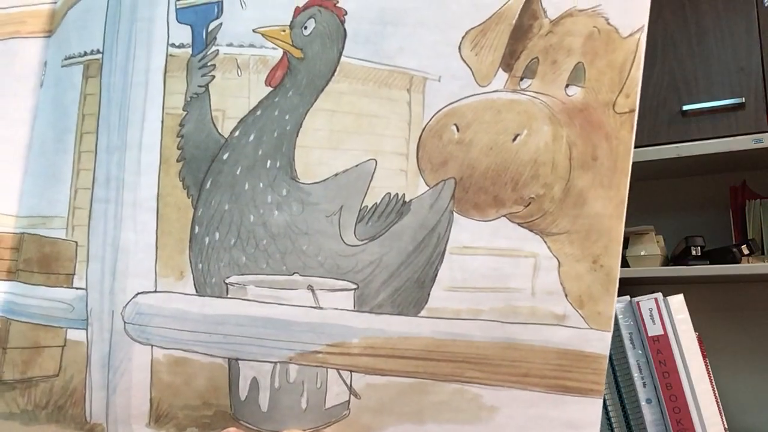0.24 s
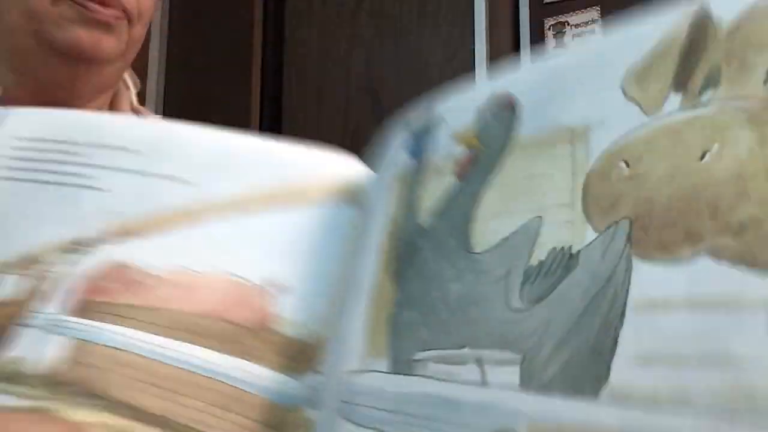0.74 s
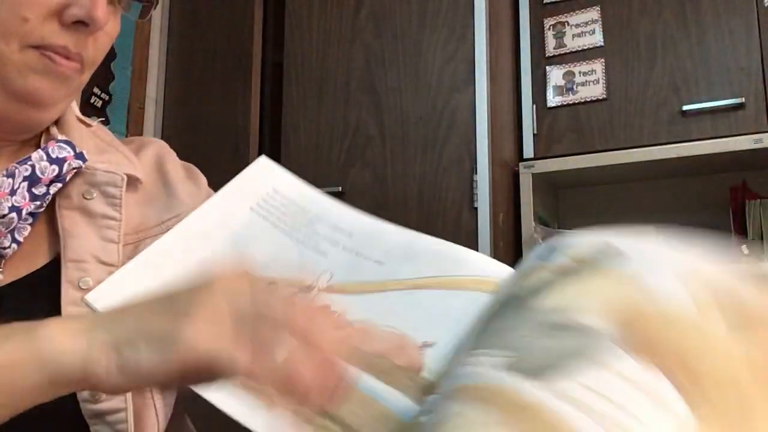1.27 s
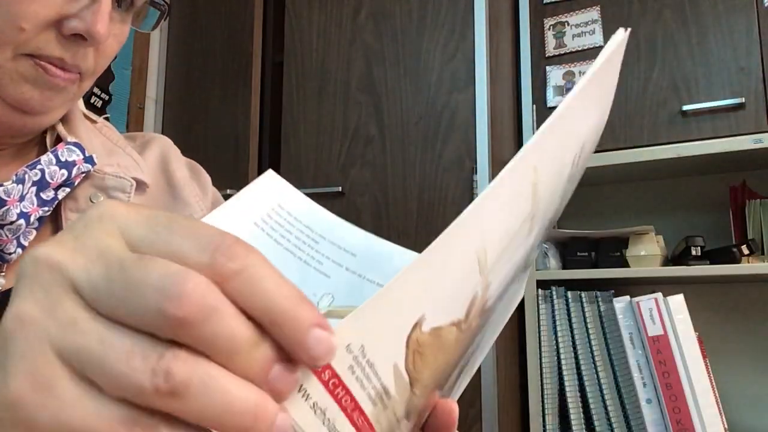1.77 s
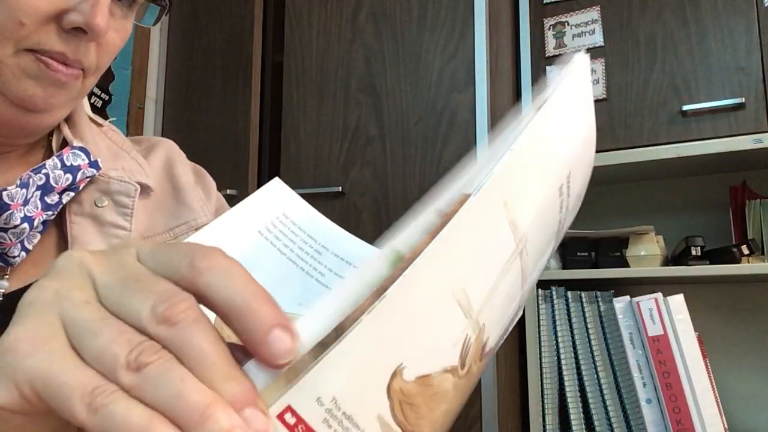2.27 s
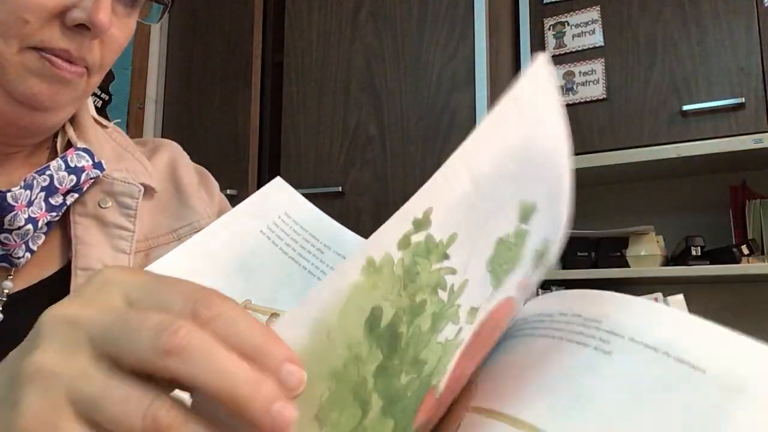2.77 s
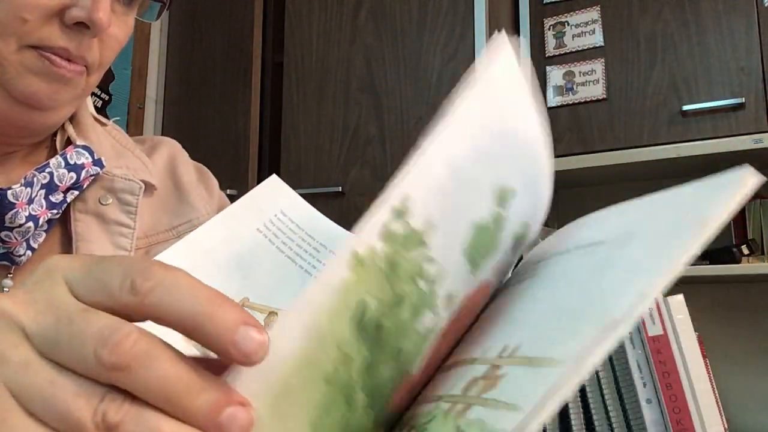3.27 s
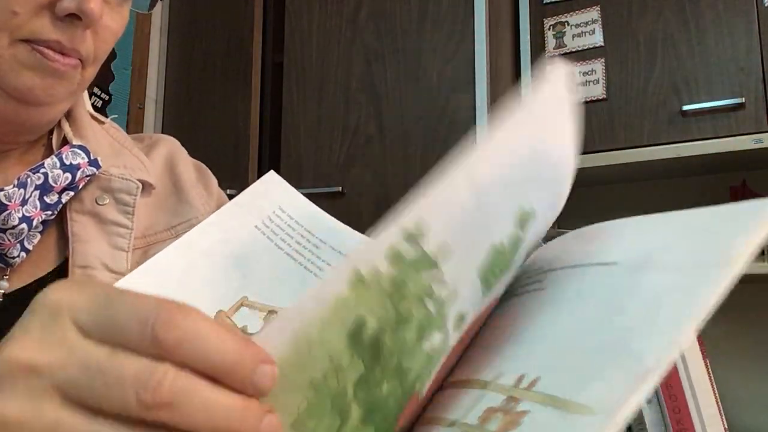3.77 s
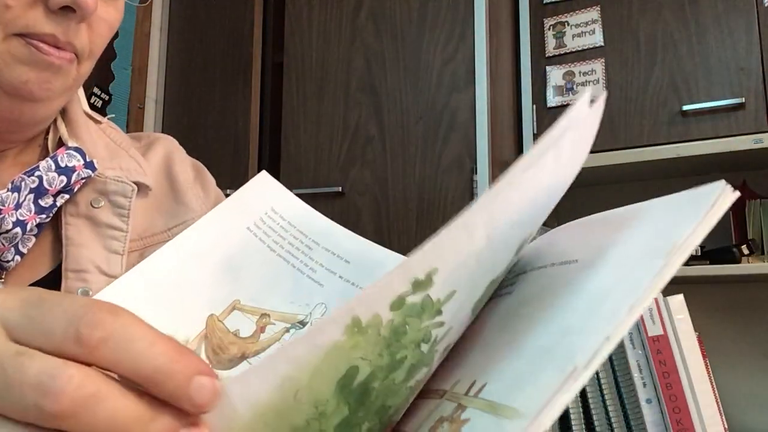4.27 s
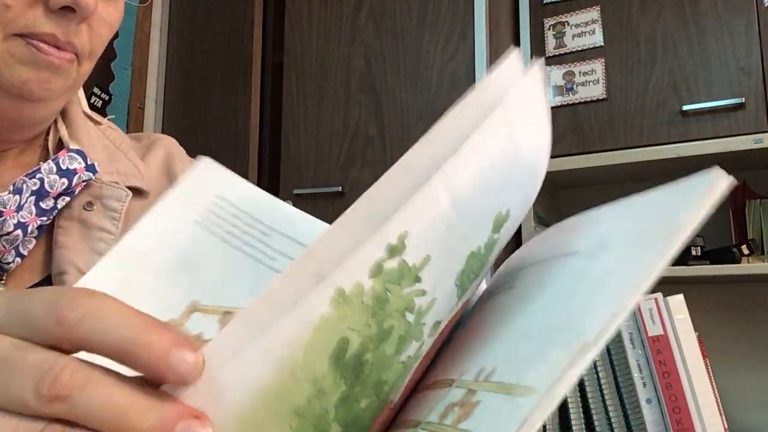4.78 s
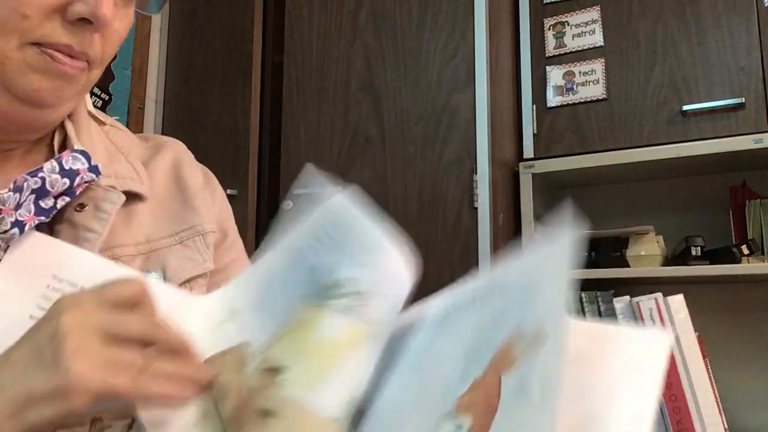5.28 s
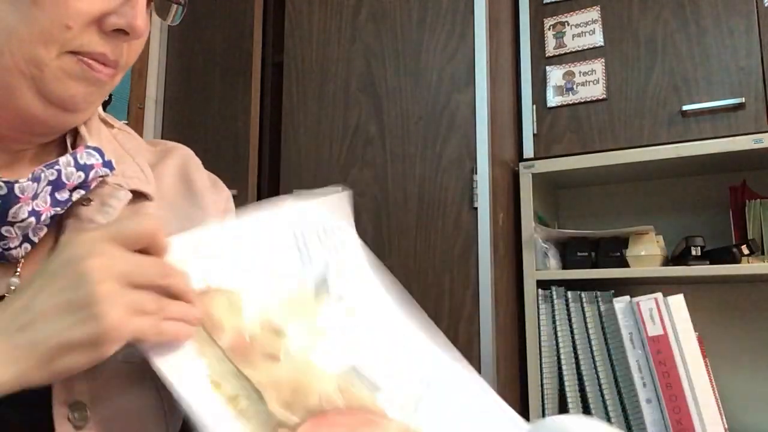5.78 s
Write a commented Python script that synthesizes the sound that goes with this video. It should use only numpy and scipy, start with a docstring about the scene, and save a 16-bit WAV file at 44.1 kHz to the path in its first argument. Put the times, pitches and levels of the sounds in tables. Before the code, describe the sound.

In a quiet room with a faint low rumble, paper rubs softly as a book is handled near the microphone. Page edges tick and flutter off a thumb in short runs, with a few dull bumps from the book. The rustling then gets busier and louder, with dry scrapes and crisp snaps of bending sheets, and ends with one crackling page turn and a brief slide.

```python
"""A picture book is leafed through close to the microphone in a quiet room.
First, sheets slide with a soft friction hiss and hands bump the book. From about 1 s a thumb sticks
and slips along the page edges, sending bending waves through the sheets, in runs after 2 s and 3 s.
From about 4.5 s the pages scrape past each other more often and buckle with louder snaps.
Near 5.8 s the last page sweeps over with a crackling flap."""
import sys
import numpy as np
from scipy import signal
from scipy.fft import rfft, irfft
from scipy.io import wavfile
from scipy.ndimage import uniform_filter1d

SR = 44100
rng = np.random.default_rng(int(sys.argv[2]) if len(sys.argv) > 2 else 0)


def to_wav(sig):
    """Store sig (one row per channel, or 1-D mono) as 16-bit WAV at the path in sys.argv[1].

    Samples outside -1..1 are clipped; the rate is SR.
    """
    pcm = np.clip(np.atleast_2d(sig), -1, 1) * 32767
    pcm = np.round(pcm).astype(np.int16)
    wavfile.write(sys.argv[1], SR, pcm.T)  # frames by channels


N = 265923

# Page edges escaping the thumb: time_s, sheet_level_db, edge_level_db
THUMB_SLIPS = [(0.9667, -50, -68), (1.4523, -50, -49), (2.008, -57.5, -49), (2.052, -55, -46.5),
               (2.0994, -48, -45.5), (2.16, -46.5, -45), (2.199, -48.5, -47), (2.2446, -49.5, -45.5),
               (2.2902, -55, -48.5), (2.3218, -63, -47.5), (2.3501, -57.5, -49), (2.3719, -64, -52),
               (2.4013, -62, -52.5), (2.492, -45.5, -46.5), (3.1913, -49.5, -55), (3.2727, -41, -42),
               (3.3369, -43, -45), (3.407, -42, -45), (3.515, -39, -46.5), (3.5621, -35.5, -43.5),
               (3.6108, -36, -44.5), (3.6382, -36.5, -50), (3.658, -44, -46), (3.68, -49, -61),
               (3.699, -44, -59), (3.7977, -42, -60)]
# The book's thump relative to the sheet, strongest while it is tipped open: time_s, level_db
BOOK_ROCKING = [(3.27, -16.5), (3.34, -1.5), (3.54, -5), (3.8, -23)]
# Spectrum of a flexed sheet: frequency_hz, level_db
RATTLE_SPECTRUM = [(80, -6), (170, 5), (400, 1.5), (800, -7.5), (1400, -3), (2400, -11.5), (6000, -25.5),
                   (16000, -64)]
# Spectrum of a rubbed page edge: frequency_hz, level_db
EDGE_SPECTRUM = [(150, 1), (400, 4), (900, 2), (2000, 0.5), (3800, 0), (5000, -1.5), (7000, -2),
                 (10000, -6.5), (13000, -5), (14700, -7.5), (16000, -25)]


def thumb_slips(flex_db=4, dive_s=0.0004, rise_s=0.00022, fall_s=0.0067, rattle_db=-10, rattle_s=0.012,
                thump_db=5, book_hz=86, book_s=0.0062, tick_db=-1, tick_s=0.0042,
                creep_db=-14, creep_s=0.0028):
    """Stick-slip launches bending waves. By dispersion the treble arrives first, so the pitch dives."""
    out, t = np.zeros(N), np.arange(4096) / SR
    for time_s, sheet_db, edge_db in THUMB_SLIPS:
        path, spread, grip = np.exp(rng.normal(0, [.2, .07, .1]))
        cycles = 1.1 * spread * np.log1p(t / (dive_s * path))
        flex = np.sin(2 * np.pi * cycles) * np.exp(-t / fall_s) * (1 - np.exp(-t / rise_s))
        # the wave reflects from the edges as a papery rattle, and rocks the book
        reflections = rng.standard_normal(len(t)) * np.exp(-t / rattle_s)
        rattle = colour(reflections, RATTLE_SPECTRUM, ripple_db=2)
        thump = np.sin(2 * np.pi * book_hz * grip * t) * t / book_s * np.exp(1 - t / book_s)
        book_db = sheet_db + np.interp(time_s, *np.transpose(BOOK_ROCKING))
        release = friction(len(t), 3000, 1.3, 0.2) * np.exp(-t / tick_s)
        tick = colour(release, EDGE_SPECTRUM, ripple_db=2.8)
        add(out, time_s, amp(sheet_db + flex_db) * (flex + amp(rattle_db) * rattle))
        add(out, time_s, amp(edge_db + tick_db) * tick + amp(book_db + thump_db) * thump)
        # just before it lets go, the edge creeps under the thumb
        creep = colour(friction(len(t), 3100, 4.5, 0.55), EDGE_SPECTRUM, tilt_db=-0.8)
        add(out, time_s - t[-1], amp(edge_db + creep_db) * creep * np.exp(-t[::-1] / creep_s))
    return out


# Sheets buckling: time_s, level_db, centre_hz
PAPER_SNAPS = [(1.159, -52.5, 2450), (2.486, -50, 1970), (2.776, -50, 1600), (3.059, -64, 1690),
               (4.422, -55.5, 1510), (4.846, -45.5, 2190), (5.114, -34.5, 4200), (5.148, -48, 1400),
               (5.222, -45, 2000), (5.270, -44, 2980), (5.319, -28.5, 2950), (5.326, -33.5, 3370),
               (5.339, -40, 1910), (5.423, -52, 1800)]


def snaps(rows, gain_db=5, crack_s=0.0006, ring=0.4, ring_s=0.0052, low_db=-14, high_db=-14, top_db=-32):
    """Buckling: a sheet gives way with a crack, then rings for a few milliseconds."""
    out, t = np.zeros(N), np.arange(4096) / SR
    for time_s, level_db, hz in rows:
        crack = rng.choice([-1, 1], len(t)) * (np.exp(-t / crack_s) + ring * np.exp(-t / ring_s))
        spectrum = [(hz / 8, low_db), (hz / 2, -3), (hz, 0), (hz * 1.26, -2),
                    (hz * 2.7, high_db), (hz * 6, top_db)]
        add(out, time_s, amp(level_db + gain_db) * colour(crack, spectrum, ripple_db=2.5))
    return out


# Spectrum of a whole page flapping: frequency_hz, level_db
FLAP_SPECTRUM = [(100, -9), (400, -4.5), (800, -3), (1300, -1.5), (2000, 0.5), (2900, -1), (4300, -7.5),
                 (6000, -13.5), (8500, -32), (12000, -51), (16000, -51)]


def page_sweep(bend_at_s=5.784, flip_at_s=5.837, last_buckle_db=-25, growth_db=19,
               last_buckle_hz=2740, climb_octaves=0.74,
               crackle_db=-31.5, rise_s=0.019, fall_s=0.016, swish_db=-30, swish_s=0.014):
    """Repeated buckling: the last page snaps in a growing run, swishes over, and its crackle decays."""
    bend_s = flip_at_s - bend_at_s
    to_go = np.linspace(1, 0, num=6)
    run = zip(flip_at_s - bend_s * to_go,
              last_buckle_db - growth_db * to_go ** 2,
              last_buckle_hz / 2 ** (climb_octaves * to_go))
    # a whole page buckles more softly and dully than an edge
    buckles = snaps(run, gain_db=0, crack_s=0.0013, ring=0.73, ring_s=0.0054,
                    low_db=-26, high_db=-19, top_db=-40)
    t = np.arange(N) / SR - flip_at_s
    onset = np.clip(1 + t / bend_s, 0, 1)
    envelope = onset * np.exp(np.minimum(t / rise_s, np.minimum((swish_s - t) / fall_s, 0)))
    crackle = amp(crackle_db) * envelope * colour(friction(N, 2500, 1.4, 0.33), FLAP_SPECTRUM)
    flip = np.sin(np.pi * np.clip(t / swish_s, 0, 1))
    swish = amp(swish_db) * colour(flip * friction(N, 5000, 1.4, .6), FLAP_SPECTRUM, tilt_db=4)
    return buckles + crackle + swish


# Edges rubbing: start_s, length_s, level_db, tilt_db_per_octave
EDGE_SCRAPES = [(0.938, 0.02, -61, 1), (1.445, 0.02, -62, 1), (1.472, 0.011, -67, 1),
                (1.957, .014, -60, -0.5), (2.488, 0.011, -45, -6), (3.185, 0.019, -55, -1),
                (3.233, 0.01, -57, -5.5), (4.251, 0.021, -57.5, 0), (4.566, .017, -49, 2),
                (4.611, 0.013, -48, -2), (4.718, 0.014, -45, 2), (4.744, 0.017, -45.5, -1),
                (4.773, 0.019, -45.5, -1.5), (4.814, 0.012, -42.5, -1.5), (4.844, 0.02, -45.5, -2.5),
                (5.095, 0.021, -44.5, -0.5), (5.112, 0.008, -32.5, 1.5), (5.172, 0.026, -38, 0.7),
                (5.317, 0.004, -34, 1.5), (5.325, 0.004, -39, 1), (5.720, 0.046, -43.5, 3)]


def scrapes():
    """Dry friction: one page edge drags over another in a short, grainy burst."""
    out = np.zeros(N)
    for start_s, length_s, level_db, tilt_db in EDGE_SCRAPES:
        stroke = signal.windows.tukey(int(length_s * SR), .3)
        grains = np.pad(stroke * friction(len(stroke), 5000, 2.2, .7), (0, 1024))
        add(out, start_s, amp(level_db) * colour(grains, EDGE_SPECTRUM, tilt_db, ripple_db=3.5))
    return out


# Sliding strokes: start_s, length_s, body_level_db, body_tilt_db_per_octave, hiss_level_db, swell_db
SLIDE_STROKES = [(0.512, 0.28, -72.5, -1, -77, 6), (0.81, 0.095, -63, -4, -70, 2),
                 (0.907, 0.15, -73, -2, -76, -4), (1.05, 0.23, -69.5, 0, -71.5, -4),
                 (1.511, 0.15, -77, -1, -68, -3), (1.822, 0.48, -78, 2, -76.5, 6),
                 (2.273, 0.2, -64.5, 0.5, -67, -2.5), (2.492, 0.097, -62, 0, -65.5, -12),
                 (2.612, 0.2, -62, -0.5, -66, -11), (2.837, 0.18, -62.5, 0, -66, -2),
                 (3.658, 0.17, -60, -1.5, -71.5, -5), (3.928, 0.28, -66, 1, -71, 0.5),
                 (4.334, 0.097, -71.5, -0.5, -76, 8), (4.721, 0.137, -56.5, -2, -67, -1),
                 (4.851, 0.12, -57, 2, -60, -14), (4.962, 0.13, -53, 2, -61.5, 15.5),
                 (5.122, 0.19, -52, 0.5, -58.5, 7.5), (5.319, 0.094, -50.5, 1, -55, -23),
                 (5.421, 0.18, -69.5, 0.5, -72, -4), (5.589, 0.087, -64.5, -1, -61, 1.5),
                 (5.73, 0.08, -57, -3, -52, -4), (5.878, 0.15, -59, 1.5, -64.5, -5)]
# Spectra of the sheet's body and of its friction hiss: frequency_hz, level_db
BODY_SPECTRUM = [(150, -18.5), (350, 4.5), (550, -1), (1000, -2), (1600, -1), (2800, -4.5), (4000, -5),
                 (5500, -16), (9000, -46.5), (16000, -25)]
HISS_SPECTRUM = [(1000, -24), (3000, 0.5), (4000, -3), (5000, -2), (6500, 2), (8500, -4), (10500, -3.5),
                 (13000, -2), (16000, -12.5)]


def sliding(gain_db=-2, fade_s=.012):
    """Sliding friction: sheets rub on each other and under the fingers, each stroke swelling or dying."""
    out = np.zeros(N)
    for start_s, length_s, body_db, tilt_db, hiss_db, swell_db in SLIDE_STROKES:
        t = np.arange(-fade_s, length_s + fade_s, 1 / SR)
        fade = np.clip(np.minimum(t - t[0], t[-1] - t) / (2 * fade_s), 0, 1)
        swell = amp(swell_db * (t / length_s - .5))
        body = amp(body_db) * colour(friction(len(t), 1200, 2.2, 1), BODY_SPECTRUM, tilt_db, 2.5)
        hiss = amp(hiss_db) * colour(friction(len(t), 4000, 2.4, 2.5), HISS_SPECTRUM, ripple_db=1.5)
        add(out, start_s - fade_s, fade * swell * (body + hiss))
    return amp(gain_db) * out * waver(depth_db=1.58, samples=400)


# Hand and pages touching the book: time_s, level_db, pitch_hz, decay_s, relative_width
BOOK_BUMPS = [(0.732, -53, 200, 0.009, 1), (0.853, -50.5, 930, 0.011, 0.2), (1.121, -57, 640, 0.008, 0.4),
              (1.948, -60, 3400, 0.012, 0.15), (2.489, -45, 310, 0.01, 0.8),
              (2.775, -53, 1600, 0.007, 0.25), (2.935, -49.5, 232, 0.0079, 0.4),
              (4.63, -53.5, 860, 0.013, 0.6), (4.722, -48.5, 300, 0.035, 0.6),
              (4.761, -49, 476, 0.027, 1.5), (4.807, -47.5, 400, 0.026, 1.2), (5.065, -51, 500, 0.012, 1.3),
              (5.106, -35.5, 1530, 0.011, 0.18), (5.115, -46, 110, .032, 0.7), (5.22, -42, 160, 0.016, 0.9),
              (5.318, -40, 890, 0.019, 0.1), (5.326, -47.5, 100, .022, 0.7),
              (5.365, -41, 1740, 0.0075, 0.17)]


def bumps(gain_db=2, rise_s=0.0019):
    """Damped resonance: the stack of pages answers a soft touch with a brief, hollow ring."""
    out, t = np.zeros(N), np.arange(8192) / SR
    for time_s, level_db, pitch_hz, decay_s, width in BOOK_BUMPS:
        band_hz = [pitch_hz / (1 + width), pitch_hz * (1 + width)]
        band = signal.butter(2, band_hz, "band", fs=SR, output="sos")
        ring = evened(signal.sosfilt(band, rng.standard_normal(2 * len(t)))[len(t):])
        envelope = (1 - np.exp(-t / rise_s)) * np.exp(-t / decay_s)
        add(out, time_s, amp(level_db + gain_db) * envelope * ring)
    return out


# Spectrum of hands and sleeves: frequency_hz, level_db
HANDLING_SPECTRUM = [(50, -5.5), (90, -7), (140, 1), (250, -6), (400, -11), (700, -25.5), (2000, -22.5),
                     (8000, -32), (14000, -45), (16000, -39)]


def handling(level_db=-69):
    """Handling noise: once the book moves, hands and sleeves keep up a faint, uneven rumble."""
    moving = np.interp(np.arange(N) / SR, [.45, .75], [0, 1])
    pressure = waver(depth_db=0.66, samples=2500)
    return amp(level_db) * moving * pressure * colour(rng.standard_normal(N), HANDLING_SPECTRUM)


# Spectrum of the quiet room: frequency_hz, level_db
AIR_SPECTRUM = [(25, -39), (45, -10.5), (60, -5.5), (110, -4), (155, -5), (230, -14), (350, -13),
                (450, -22), (600, -23), (1900, -30), (4000, -30), (8000, -37.5), (13000, -39.5),
                (16000, -50)]


def air(level_db=-66.5):
    """Stationary noise: the low rumble and faint hiss of the room."""
    gain = amp(read(AIR_SPECTRUM, np.fft.rfftfreq(N, 1 / SR)))
    return amp(level_db) * evened(irfft(rfft(rng.standard_normal(N)) * gain, N))


# Reverberation time of the room: frequency_hz, t60_s
ROOM_DECAY = [(100, 0.26), (500, 0.39), (2500, 0.27), (6000, 0.23), (14000, 0.48)]


def room(x, early_db=-11, tail_db=-14, early_s=0.022):
    """Reverberation: early reflections from the book and cupboards, then a short diffuse tail."""
    hz, t, noise = signal.stft(rng.standard_normal(SR // 2), SR, nperseg=256)
    decay = amp(-60 * t / read(ROOM_DECAY, hz)[:, None])
    tail = signal.istft(noise * decay, SR, nperseg=256)[1]
    tail *= np.clip(np.arange(len(tail)) / SR / early_s, 0, 1)
    early = np.zeros(len(tail))
    early[(rng.uniform(.002, early_s, size=10) * SR).astype(int)] = rng.choice([-1, 1], size=10)
    early = colour(early, [(100, 0), (4000, -1), (16000, 6)])
    echoes = amp(early_db) * early / np.linalg.norm(early) + amp(tail_db) * tail / np.linalg.norm(tail)
    return x + signal.fftconvolve(x, echoes)[:N]


def friction(samples, clicks_per_s, spread_db, hiss):
    """Shot noise: paper fibres catch in tiny clicks of uneven size over a smooth hiss."""
    size = amp(spread_db * np.minimum(rng.exponential(1, samples), 4))
    clicks = size * rng.choice([-1, 1], samples) * (rng.random(samples) < clicks_per_s / SR)
    return evened(evened(clicks) + hiss * rng.standard_normal(samples))


def colour(x, spectrum, tilt_db=0, ripple_db=0):
    """Minimum-phase filter of unit energy: a spectrum, a tilt and a curved sheet's chance resonances."""
    hz = np.fft.rfftfreq(2048, 1 / SR)
    ripple = evened(uniform_filter1d(uniform_filter1d(rng.standard_normal(len(hz)), 12), 8))
    ripple /= 1 + (hz / 7000) ** 2  # in the treble the resonances overlap and even out
    octaves = np.log2((hz + 200) / 4000)
    log_gain = np.log(amp(read(spectrum, hz) + tilt_db * octaves + ripple_db * ripple))
    mirrored = np.concatenate([log_gain, log_gain[-2:0:-1]])
    taps = np.fft.ifft(np.exp(np.conj(signal.hilbert(mirrored)))).real
    return signal.oaconvolve(x, taps / np.linalg.norm(taps))[:len(x)]


def waver(depth_db, samples):
    """Amplitude modulation by the uneven pressure of the hand."""
    drift = uniform_filter1d(uniform_filter1d(rng.standard_normal(N), samples), samples)
    return amp(depth_db * evened(drift))


def amp(db):
    """Decibels to gain."""
    return 10 ** (np.asarray(db) / 20)


def evened(x):
    """Normalisation to rms 1."""
    return x / np.sqrt(np.mean(x ** 2) + 1e-20)


def read(points, hz):
    """Interpolation on a log-frequency axis."""
    points_hz, values = np.transpose(points)
    return np.interp(np.log(hz + 1), np.log(points_hz + 1), values)


def add(mix, start_s, sound):
    """Superposition of a sound on the mix."""
    part = mix[max(round(start_s * SR), 0):][:len(sound)]
    part += sound[:len(part)]


def scene():
    """Superposition: the paper sounds and their echoes over the background noise."""
    paper = thumb_slips() + snaps(PAPER_SNAPS) + scrapes() + bumps() + sliding() + page_sweep()
    return (room(paper) + handling() + air())[None]


def record(dry, low_hz=52, high_hz=15900):
    """Band limiting: the microphone sheds deep bass, then the highest treble is cut."""
    highpass = signal.butter(4, low_hz, "high", fs=SR, output="sos")
    lowpass = signal.firwin(201, high_hz, window=("kaiser", 9), fs=SR)
    return signal.oaconvolve(signal.sosfilt(highpass, dry), lowpass[None], "same")


dry = scene()
out = record(dry)
to_wav(out)
```